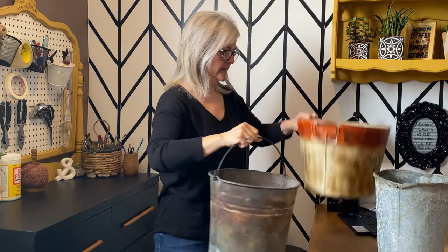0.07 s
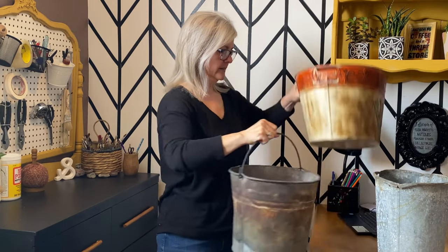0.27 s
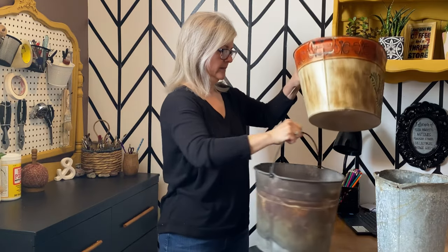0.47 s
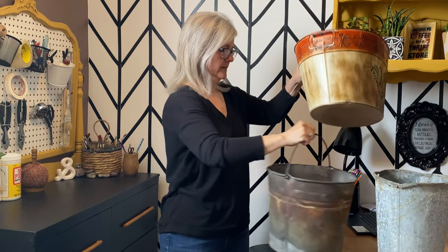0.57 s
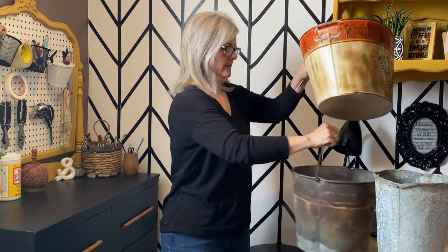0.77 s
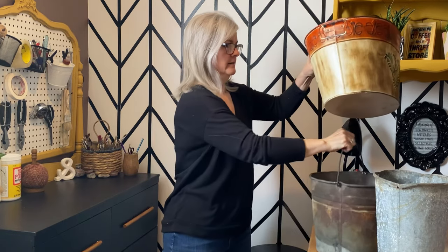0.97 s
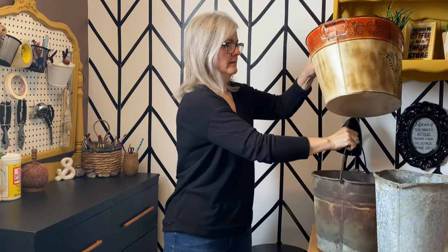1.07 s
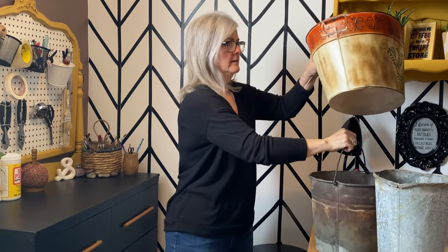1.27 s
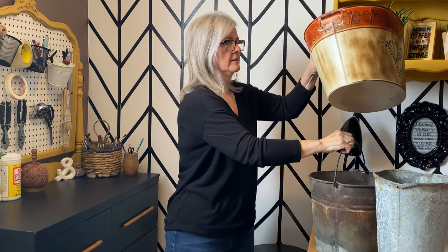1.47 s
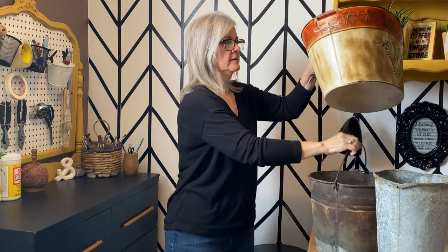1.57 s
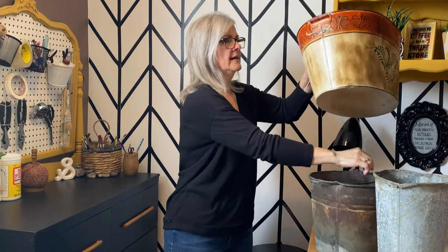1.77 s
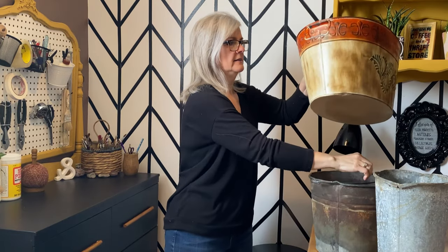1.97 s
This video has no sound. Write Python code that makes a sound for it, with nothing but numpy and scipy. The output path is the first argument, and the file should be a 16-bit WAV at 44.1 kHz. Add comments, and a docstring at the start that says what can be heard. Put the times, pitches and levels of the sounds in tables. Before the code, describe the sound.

A metal bucket lands on a table with a dull clang, then rocks and scrapes briefly. Its wire handle grates and clatters against the rim, leaving the thin metal ringing over a small room's low rumble.

```python
"""A small room with a table. A metal bucket, carried by its wire handle, is set down with a dull clang,
rocks on its flexing base and drags on its foot ring. The handle is lowered: it grates in its lugs
(stick-slip) and clatters against the rim. Every contact drives the same thin wall, which rings on
under everything, over a low room rumble."""
import sys
import numpy as np
from scipy import signal
from scipy.fft import rfft, irfft
from scipy.io import wavfile

SR = 44100
rng = np.random.default_rng(int(sys.argv[2]) if len(sys.argv) > 2 else 0)


def transcribe(signal):
    """Save signal, clipped to [-1, 1], as a 16-bit WAV file at the path in sys.argv[1]."""
    frames = np.atleast_2d(signal).T
    limited = np.clip(frames, -1, 1)
    pcm = np.round(limited * 32767).astype(np.int16)
    wavfile.write(sys.argv[1], SR, pcm)


N = 89522
T = np.arange(N) / SR


def from_db(db):
    """Decibels to gain."""
    return 10 ** (np.asarray(db) / 20)


def at_hz(points, hz):
    """Interpolate a table on a log-frequency axis."""
    f, v = np.transpose(points)
    return np.interp(np.log(np.maximum(hz, 1)), np.log(f), v)


def convolve(x, response):
    """Convolve per channel, cut to N samples."""
    return signal.fftconvolve(np.atleast_2d(x), np.atleast_2d(response), axes=-1)[:, :N]


def high_passed(x, hz, order=2):
    """Butterworth high-pass."""
    return signal.sosfilt(signal.butter(order, hz, "high", fs=SR, output="sos"), x)


def coloured(x, colour):
    """Minimum-phase filter from (frequency [Hz], gain [dB]) points."""
    size = 8192
    gain = from_db(at_hz(colour, np.fft.rfftfreq(size, 1 / SR)))
    cepstrum = irfft(np.log(gain))
    cepstrum[1:size // 2] *= 2
    cepstrum[size // 2 + 1:] = 0
    return convolve(x, irfft(np.exp(rfft(cepstrum))))


def room_tone():
    """Low steady rumble of the room."""
    # (frequency [Hz], gain [dB])
    colour = [(25, -10), (50, -3.5), (75, -6.5), (103, 2.5), (145, -14), (183, 2), (210, -10.5), (240, -3),
              (300, -15.5), (400, -29.5), (800, -45), (2000, -55.5), (8000, -54), (16000, -69)]
    level_db, side_db = -47, -5.5
    mid, side = coloured(rng.standard_normal((2, N)), colour)
    return from_db(level_db) * (mid + from_db(side_db) * side * [[1], [-1]]) / mid.std()


def diffuse_modes(t60_table, mean_gap_hz):
    """Stereo response of many random modes, one decay time per octave."""
    # stereo width: (frequency [Hz], side over mid [dB])
    side_over_mid = [(60, -15), (280, -11), (550, -4.5), (1100, -3.5), (2200, -3), (4500, -6), (8000, 0),
                     (15000, 1.5)]
    size = 65536
    hz, t = np.fft.rfftfreq(size, 1 / SR), np.arange(size) / SR
    present = rng.random(len(hz)) < hz[1] / mean_gap_hz
    mid, side = np.exp(2j * np.pi * rng.random((2, len(hz)))) * present
    width = from_db(at_hz(side_over_mid, hz))
    spectrum = np.array([mid + width * side, mid - width * side]) / np.sqrt(1 + width ** 2)
    spectrum /= irfft(spectrum).std() * np.sqrt(SR / 100)  # unit energy per 10 ms
    octaves_hz = 62.5 * 2 ** np.arange(9)
    response = np.zeros((2, size))
    for centre_hz in octaves_hz:
        band = at_hz(np.c_[octaves_hz, octaves_hz == centre_hz], hz)
        response += irfft(spectrum * band) * from_db(-60 * t / at_hz(t60_table, centre_hz))
    return response


def ringing(modes):
    """Decaying sines after a unit blow; they reach the right side first."""
    left_lag_s = 0.00038
    t = np.maximum(T - [[left_lag_s], [0]], 0)
    return sum(from_db(db - 60 * t / t60_s) * np.sin(2 * np.pi * hz * t) for hz, db, t60_s in modes)


def body_ring(gain_db):
    """Clear modes of the bucket, shared by all contacts."""
    # one entry per mode: (frequency [Hz]), (level [dB]), (T60 [s])
    mode_hz = [235.6, 255.7, 291.5, 317.3, 360, 391, 441.2, 532.2, 589, 677.8, 718, 775, 837, 911, 1024,
               1078, 1247, 1414]
    mode_db = [-7.5, -5.5, -1.5, 0.5, -4, -9, -7.5, 0, 1, -1.5, -11, -24.5, -3, 14, -12, -27, 1, -6.5]
    mode_t60_s = [4.2, 2.1, 0.7, 0.95, 1.07, 1.4, 1.68, 0.91, 0.83, 0.9, 2.1, 2.4, 1.1, 0.39, .7, 0.97,
                  0.88, 1.3]
    return from_db(gain_db) * ringing(zip(mode_hz, mode_db, mode_t60_s))


def rim_and_handle_ring(body_db, rim_and_handle_db):
    """The bucket's rim and the handle ring together; the body's lowest modes are hardly stirred."""
    # (frequency [Hz], level [dB], T60 [s])
    rim_and_handle_modes = [(194.7, -12.5, 0.25), (550.4, -15, .25), (579, -12, .3), (908, -14, 0.52),
                            (1080, -17.5, 0.41), (1200, -24, 0.23), (1435, -12, .3), (1870, -23, 0.5),
                            (2047, -25, .3), (2240, -26, 0.49), (2464, -17.5, .3), (2937, -11, 0.067),
                            (4080, -11.5, 0.43)]
    body = high_passed(body_ring(body_db), hz=400)
    return body + from_db(rim_and_handle_db) * ringing(rim_and_handle_modes)


def bucket(force, colour, ring, direct_db, room_db):
    """A force heard as bare contact, clear modes, dense sheet-metal modes and room reverberation."""
    # decay of wall and room: (frequency [Hz], T60 [s])
    wall_t60 = [(1000, 3.3), (2500, 0.88), (6000, 0.82), (14000, 0.18)]
    room_t60 = [(60, 0.75), (300, 0.21), (1000, 0.36), (3000, 0.32), (7000, 0.26), (14000, 0.13)]
    wall = from_db(2.5) * high_passed(diffuse_modes(wall_t60, mean_gap_hz=23.8), hz=675)
    room = from_db(room_db) * diffuse_modes(room_t60, mean_gap_hz=0.5)
    sound = from_db(direct_db) * force + convolve(force, ring) + convolve(force, wall + room)
    return coloured(sound, colour)


def blows(contacts):
    """One force impulse per contact."""
    force = np.zeros(N)
    for time_s, db in contacts:
        force[int(time_s * SR)] += from_db(db)
    return force


def stick_slip(strokes):
    """Metal sticks and slips: tiny uneven impulses throughout each stroke."""
    slips_per_s, edge_s, slip_db, spread_db = 1500, 0.0075, -10.5, 1
    effort = np.zeros(N)
    for start_s, length_s, db in strokes:
        inside_s = np.minimum(T - start_s, start_s + length_s + edge_s - T)
        effort += from_db(db) * np.clip(inside_s / edge_s, 0, 1)
    slips = (rng.random(N) < slips_per_s / SR) * rng.choice([-1, 1], N)
    scatter_db = spread_db * np.clip(rng.standard_normal(N), -2, 2)
    return effort * slips * from_db(slip_db + scatter_db)


def squeak():
    """The wire squeaks in a lug as the bucket swings: slips excite one high resonance."""
    centre_hz, width_hz = 5300, 1050
    start_s, length_s, level_db = 0.0, 0.019, -26
    b, a = signal.iirpeak(centre_hz, centre_hz / width_hz, fs=SR)
    return signal.lfilter(b, a, stick_slip([(start_s, length_s, level_db)]))


def dragging():
    """The foot ring sticks and slips on the table."""
    # (start [s], length [s], level [dB])
    strokes = [(1.32, 0.048, -24.5), (1.485, 0.079, -15.5), (1.565, .05, -15.5)]
    # (frequency [Hz], gain [dB])
    colour = [(30, -21), (95, 3.5), (170, -18), (300, 6.5), (450, 2.5), (900, -10), (1300, -10.5),
              (2300, -17.5), (4000, -34), (12000, -53)]
    return bucket(stick_slip(strokes), colour, body_ring(-27), direct_db=3, room_db=28.5)


def rocking():
    """The base flexes and thumps as the bucket rocks."""
    # (time [s], level [dB])
    thumps = [(0.005, -26.5), (1.245, -3.5), (1.274, 0), (1.951, -8), (1.984, -11)]
    # (frequency [Hz], gain [dB])
    colour = [(30, -17.5), (110, -13), (200, 10), (300, 1.5), (400, 3), (550, -3.5), (1000, -24),
              (2000, -32), (5000, -61), (15000, -79)]
    # (frequency [Hz], level [dB], T60 [s])
    base_modes = [(248, -23.5, .18), (287, -9.5, 0.19), (335.4, -21, 0.25)]
    flex_s = 0.0027
    base_ring = ringing(base_modes) * (1 - np.exp(-T / flex_s))
    return bucket(blows(thumps), colour, body_ring(-32) + base_ring, direct_db=-11, room_db=25)


def grating():
    """The handle sticks and slips in its lugs."""
    # (start [s], length [s], level [dB])
    strokes = [(0.0, 0.018, -42.5), (0.025, 0.12, -53), (0.237, 0.031, -45.5), (1.236, 0.09, -51),
               (1.318, 0.019, -41.5), (1.392, 0.17, -51.5), (1.474, 0.029, -30), (1.574, 0.042, -13.5),
               (1.604, 0.027, -7.5), (1.619, 0.045, -4), (1.675, 0.047, -11), (1.727, 0.029, -5),
               (1.775, 0.02, -21)]
    # (frequency [Hz], gain [dB])
    colour = [(60, -42), (300, -1.5), (600, -5), (1100, 0.5), (1700, -3.5), (2600, -3), (3600, -9.5),
              (5500, -11), (8000, -14.5), (11000, -20.5), (15000, -34.5)]
    ring = rim_and_handle_ring(body_db=-25.5, rim_and_handle_db=-4.5)
    return bucket(stick_slip(strokes) + squeak(), colour, ring, direct_db=23.5, room_db=27.5)


def clatter():
    """The handle strikes lugs and rim."""
    # (time [s], level [dB])
    clanks = [(1.484, -25), (1.611, -4.5), (1.620, 3), (1.624, -0.5), (1.637, -1), (1.689, -11),
              (1.743, -8.5), (1.792, -38)]
    # (frequency [Hz], gain [dB])
    colour = [(30, -40), (110, -9.5), (200, -6.5), (330, 9), (450, -11.5), (580, -1), (1000, -1),
              (1800, -6), (2600, -2.5), (4000, -14), (6500, -14.5), (10500, -16.5), (15000, -23)]
    ring = rim_and_handle_ring(body_db=-26.5, rim_and_handle_db=0)
    return bucket(blows(clanks), colour, ring, direct_db=16, room_db=29.5)


def landing():
    """Five close contacts: the foot ring clangs briefly and the table gives a low thud."""
    # (time [s], level [dB])
    contacts = [(0.8945, -18), (0.8995, -4), (0.9035, 9.5), (0.917, 2), (0.952, -2)]
    # (frequency [Hz], gain [dB])
    colour = [(30, -32), (120, -12), (200, -8), (300, 3), (480, -2), (850, -1.5), (1100, -6.5),
              (1350, -12.5), (2400, -25.5), (4500, -38.5), (8000, -40.5), (15000, -49)]
    # (frequency [Hz], level [dB], T60 [s])
    foot_and_table_modes = [(122.2, -19.5, 0.56), (310.1, -17.5, 0.25), (699, -13.5, 0.094),
                            (845, -7.5, 0.18), (944, -11.5, .06), (1097, -10, 0.099)]
    ring = body_ring(-26) + ringing(foot_and_table_modes)
    return bucket(blows(contacts), colour, ring, direct_db=7, room_db=30)


def panned(stereo):
    """Bass leans right, treble left."""
    # (frequency [Hz], left over right [dB])
    balance = [(80, -3), (280, -4), (550, 0.5), (1000, -2), (2000, 1.5), (4000, 3.5), (8000, 1)]
    left = coloured(stereo[0], [(hz, db / 2) for hz, db in balance])
    right = coloured(stereo[1], [(hz, -db / 2) for hz, db in balance])
    return np.vstack([left, right])


def scene():
    """Five kinds of contact on one bucket, over the room tone."""
    return panned(landing() + rocking() + dragging() + clatter() + grating()) + room_tone()


def record(dry):
    """Microphone: bass roll-off, two treble notches, rounded peaks, steep top cut."""
    low_hz, top_hz, ceiling = 34.3, 15900, 0.9
    x = high_passed(dry, low_hz, order=1)
    for hz, width_hz in [(9100, 2100), (13200, 940)]:
        b, a = signal.iirnotch(hz, hz / width_hz, fs=SR)
        x = signal.lfilter(b, a, signal.lfilter(b, a, x))
    rounded = x / (1 + (x / ceiling) ** 4) ** 0.25
    return signal.sosfilt(signal.ellip(10, 0.5, 60, top_hz, fs=SR, output="sos"), rounded)


dry = scene()
out = record(dry)
transcribe(out)
```